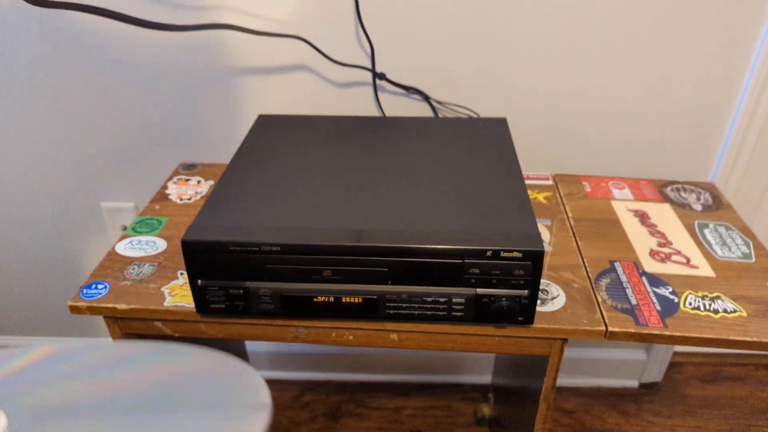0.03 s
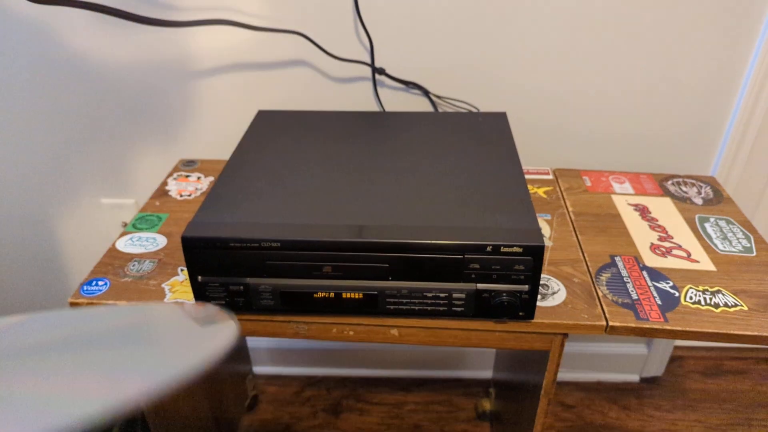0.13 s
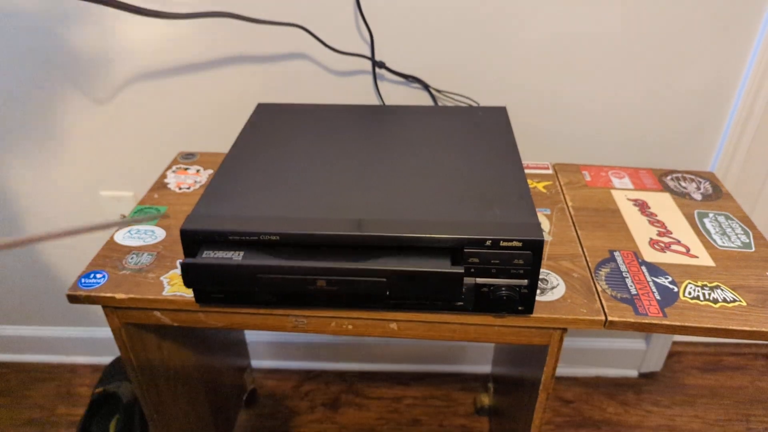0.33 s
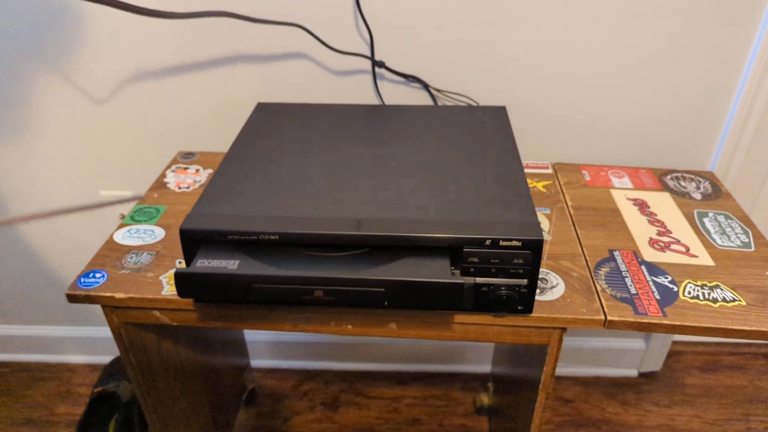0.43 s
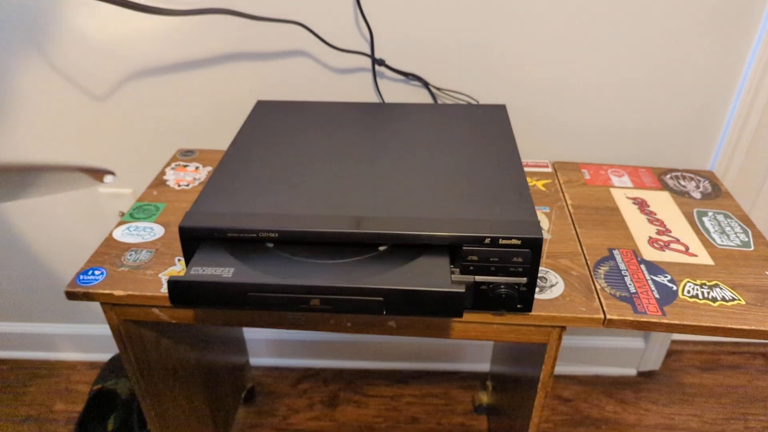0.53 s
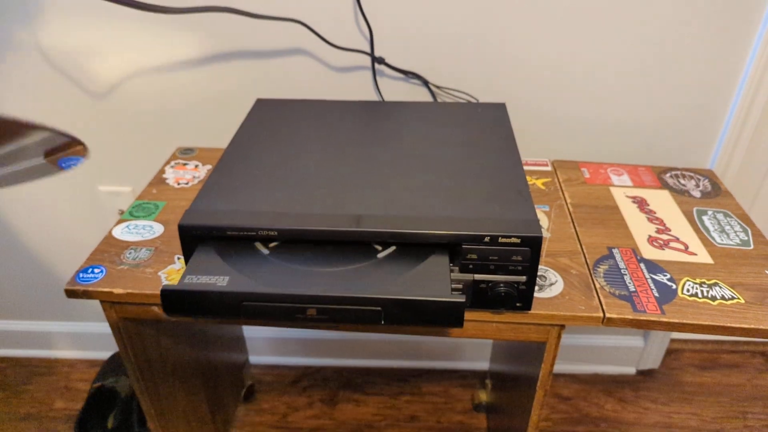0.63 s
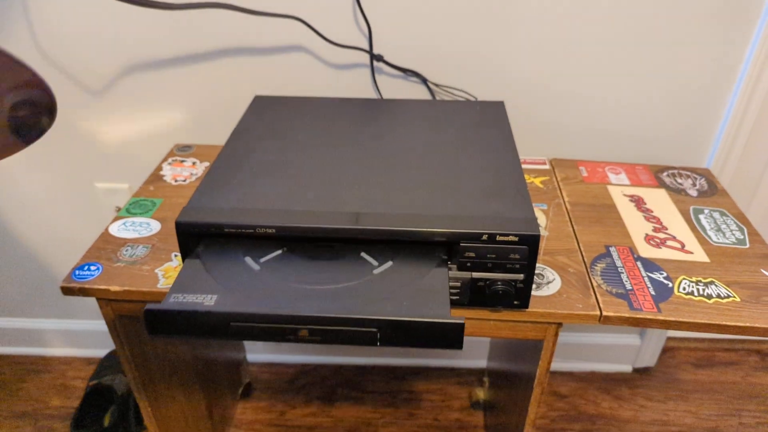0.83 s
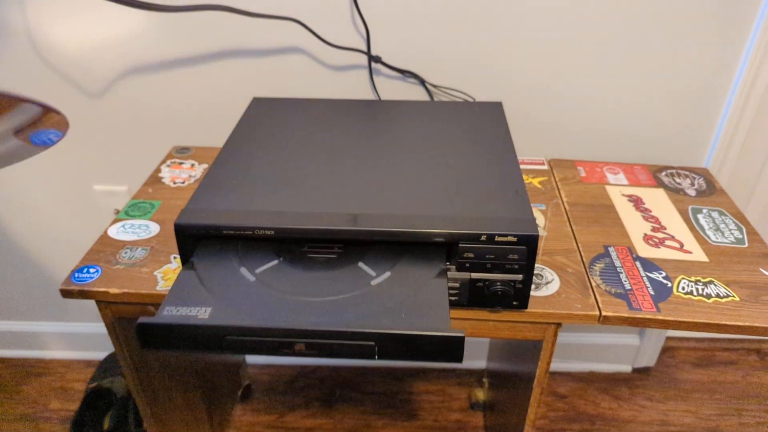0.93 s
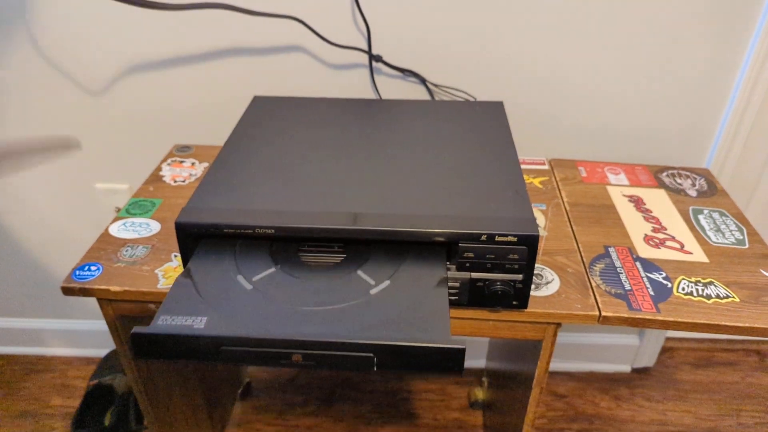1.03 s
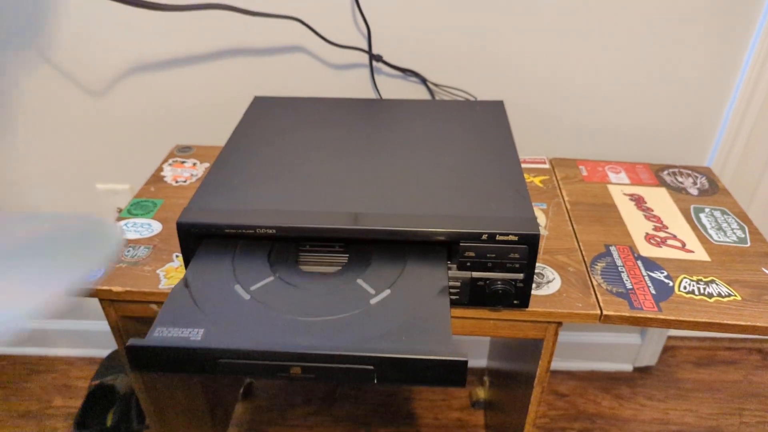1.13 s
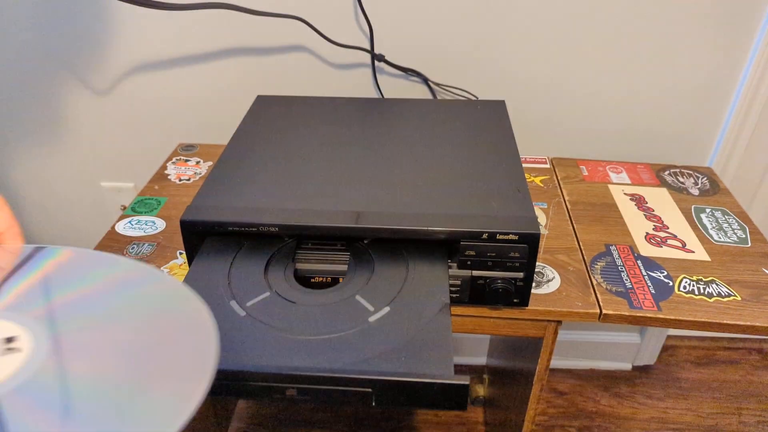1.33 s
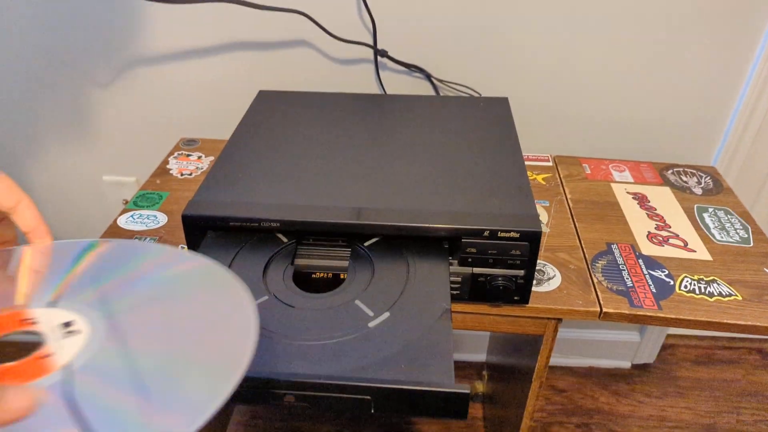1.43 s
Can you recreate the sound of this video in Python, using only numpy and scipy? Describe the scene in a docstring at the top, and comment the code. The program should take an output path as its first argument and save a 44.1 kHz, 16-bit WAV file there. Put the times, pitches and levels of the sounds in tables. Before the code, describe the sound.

In a quiet room, a disc player's tray unlatches with a rapid plastic clatter that booms slightly in a wooden table. Its motor then whirs low and hollow as the tray rolls out, lightly ticking and bumping.

```python
"""A light tick and a faint spin of gears, then a quick run of plastic knocks: a carousel disc player
opens its tray on a wooden table in a small quiet room. The knocks are the disc clamp letting go;
they boom in the table and ring the steel cabinet. Then the geared tray slides out with a low whir
and a hollow drone, scraping its rails and bumping now and then."""
import sys
import numpy as np
from scipy import signal
from scipy.fft import rfft, irfft, next_fast_len
from scipy.io import wavfile
from scipy.ndimage import map_coordinates

SR = 44100
rng = np.random.default_rng(int(sys.argv[2]) if len(sys.argv) > 2 else 0)


def generate_wav(signal):
    """Clip the signal to [-1, 1] and save it as 16-bit WAV at the path in sys.argv[1]."""
    frames = np.transpose(np.atleast_2d(signal))
    scaled = np.clip(frames, -1, 1) * 32767
    pcm = np.round(scaled).astype(np.int16)
    wavfile.write(sys.argv[1], SR, pcm)


N = 66150


def amp(db):
    """Decibels to gain."""
    return 10 ** (np.asarray(db) / 20)


def since(start_s):
    """Seconds since start_s, zero before it."""
    return np.maximum(np.arange(N) / SR - start_s, 0)


def curve(points):
    """Automation: (time_s, value) points as one value per sample."""
    return np.interp(since(0), *np.transpose(points))


def wobble(rate_hz):
    """Smooth random modulation through rate_hz points a second."""
    return map_coordinates(rng.standard_normal(1000), [since(0) * rate_hz], mode="wrap")


def decay(t, attack_s, t60_s):
    """Percussive envelope: a rise, then an exponential fall."""
    return (1 - np.exp(-t / attack_s)) * np.exp(-np.log(1000) * t / t60_s)


def filtered(x, response):
    """x through a gain that depends on frequency."""
    size = next_fast_len(N + SR // 2)
    return irfft(rfft(x, size) * response(np.fft.rfftfreq(size, 1 / SR)), size)[:N]


def coloured(x, eq):
    """x through an EQ of (freq_hz, gain_db) points, scaled to rms 1."""
    freq_hz, gain_db = np.transpose(eq)
    shaped = filtered(x, lambda hz: amp(np.interp(np.log(hz + 1), np.log(freq_hz), gain_db)))
    return shaped / np.sqrt(np.mean(shaped ** 2) + 1e-20)


def noise(eq):
    """Fresh noise through an EQ, at rms 1."""
    return coloured(rng.standard_normal(N), eq)


# Dark bed of the room: freq_hz, gain_db
ROOM_EQ = [(20, -49), (38, 1.5), (55, 3.5), (115, 7), (170, -1.5), (290, 1.5), (450, -4), (1300, 0),
           (2100, -2), (3300, -17), (10000, -33.5), (15500, -35)]

def room_tone(level_db=-59):
    """The steady hush of a small room."""
    return amp(level_db) * noise(ROOM_EQ)


def early_echoes(x, level_db=-15.5, centre_hz=2210, width_octaves=2.13):
    """Table and wall add eight weak reflections to x, mostly in the midrange."""
    delays_s = rng.uniform(0.001019, 0.011, 8)

    def response(hz):
        midrange = np.exp(-(np.log2((hz + 1) / centre_hz) / width_octaves) ** 2)
        echoes = np.exp(-2j * np.pi * np.outer(hz, delays_s)).sum(1)
        return 1 + amp(level_db) * midrange * echoes
    return filtered(x, response)


# Fader ride of the drone: time_s, level_db
DRONE_LEVEL = [(0, -64), (.48, -76), (.56, -59), (.67, -58), (.76, -70.5), (.95, -63.5), (1.12, -71.5),
               (1.25, -66), (1.5, -65)]
# Hollow body of the tray: freq_hz, gain_db
DRONE_EQ = [(100, -31), (170, -3.5), (220, 1), (310, 1), (370, -16.5), (1000, -44)]

def tray_drone():
    """The tray drones low and hollow, swelling and sinking."""
    return amp(curve(DRONE_LEVEL)) * noise(DRONE_EQ)


# Tone of the free-running gears: freq_hz, gain_db
IDLE_EQ = [(150, -30), (230, -5), (420, -4.5), (620, -13), (800, -25), (950, -31), (1280, -1), (1600, -9.5),
           (2100, -2), (2400, -7), (3400, -20.5), (8500, -20), (12200, -21), (15500, -29)]

def idle_gears(start_s=0.025, stop_s=0.27, ramp_s=0.047, level_db=-58.5):
    """The gears spin up and run free until the tray moves."""
    fade_in = np.clip(since(start_s) / ramp_s, 0, 1)
    fade_out = np.clip(since(stop_s) / ramp_s, 0, 1)
    return (fade_in - fade_out) * amp(level_db + 1.4 * wobble(92)) * noise(IDLE_EQ)


# Cues for the cam and gear rack: start_s, level_db
TICK_CUES = [(0.028, -47), (0.129, -54.5), (0.199, -45), (0.206, -37), (.700, -60), (.803, -52),
             (0.81, -49.5), (.848, -50.5), (1.097, -48), (1.267, -49), (1.427, -50)]
# Midrange snap of a tick: freq_hz, gain_db
TICK_EQ = [(300, -37), (950, -19), (1300, 4.5), (1500, 4.5), (1750, 1), (2050, 5), (2500, -9),
           (3200, -22.5), (4400, -18.5), (6000, -23.5), (15000, -27)]

def cam_ticks():
    """Light, dry plastic contacts that leave the cabinet silent."""
    return sum(amp(db) * decay(since(start_s), attack_s=0.00085, t60_s=0.079) * noise(TICK_EQ)
               for start_s, db in TICK_CUES)


# Thuds of the tray: start_s, level_db, pitch_hz
BUMP_CUES = [(0.644, -39, 215), (0.768, -41, 90.6), (0.991, -34, 102), (1.06, -42, 58), (1.279, -44, 57.6)]

def tray_bumps():
    """The moving tray bumps: short low thuds with no click."""
    out = np.zeros(N)
    for start_s, db, hz in BUMP_CUES:
        t = since(start_s)
        thud = np.sin(2 * np.pi * hz * t + 0.38 * wobble(70))
        out += amp(db) * decay(t, attack_s=0.012, t60_s=0.057) * thud
    return out


# Fader ride of the sliding hiss: time_s, level_db
HISS_LEVEL = [(0, -71), (.15, -74.5), (.3, -71.5), (.37, -55.5), (.45, -68), (.56, -64.5), (.75, -67.5),
              (.79, -56.5), (.83, -55), (.85, -67.5), (.98, -66), (1.005, -60.5), (1.03, -69), (1.09, -60),
              (1.14, -70), (1.3, -64), (1.4, -71), (1.49, -60.5)]
# Airy top of sliding plastic: freq_hz, gain_db
HISS_EQ = [(3000, -21), (8000, -12), (10300, 1), (11000, -0.5), (12000, 7.5), (13400, -3.5), (15500, 0)]
# Catches on the rails: start_s, length_s, level_db, pitch_hz
SCRAPE_CUES = [(.800, 0.035, -45, 1384), (0.802, 0.046, -48, 927), (1.097, 0.026, -49, 1048),
               (1.306, 0.028, -56.5, 972)]

def rails():
    """Sliding plastic hisses, and squeaks dully where it catches."""
    out = amp(curve(HISS_LEVEL) + 0.83 * wobble(150)) * noise(HISS_EQ)
    for start_s, length_s, db, hz in SCRAPE_CUES:
        t = since(start_s)
        swell = np.sin(np.pi * np.minimum(t / length_s, 1))
        squeak = np.sin(2 * np.pi * hz * t + 1.2 * wobble(140))
        grit = amp(-14) * noise(WHIR_EQ)
        out += amp(db) * swell * (squeak + grit)
    return out


# Motor speed, sagging as the tray hangs further out: time_s, speed_ratio
MOTOR_SPEED = [(0, 0.95), (.62, 1.023), (.75, 1.005), (.92, 0.99), (1.08, .975), (1.22, 0.93), (1.5, 0.94)]
# Load on the drive, the fader for all its layers: time_s, level_db
DRIVE_LOAD = [(0, -61), (.19, -65.5), (.23, -44), (.45, -53.5), (.58, -52), (.75, -54), (.95, -54),
              (1.1, -54.5), (1.25, -54.5), (1.42, -54), (1.5, -55)]
# Whir of the moving tray: freq_hz, gain_db
WHIR_EQ = [(88, -33), (150, -3), (169, 0), (308, -8.5), (346, -31), (373, -11.5), (500, -8.5), (618, -3.5),
           (751, -11.5), (1000, -2.5), (1170, -4), (1400, -2.5), (1600, -4.5), (1800, -2), (1940, -4.5),
           (2230, -5.5), (3620, -21), (4390, -16), (5330, -29), (7130, -18), (8010, -26), (12000, -21.5),
           (15500, -41)]
# Gear whine at speed_ratio 1: pitch_hz, gain_db
WHINE_PARTIALS = [(1039, -10.5), (1078, -15), (1120, -16), (1392, -15), (1765, -15), (1800, -18.5),
                  (2135, -19.5), (4420, -30)]
# Chassis hum, independent of speed: pitch_hz, gain_db
HUM_PARTIALS = [(119, -16.5), (612, -20.5), (689, -22.5)]

def tray_drive(tooth_hz=120.84, tooth_count=300, flutter=0.00678):
    """Uneven gear teeth tick over rail friction, gear whine and hum, all following the load."""
    speed = curve(MOTOR_SPEED) * (1 + flutter * wobble(22))
    travel = np.cumsum(speed) / SR  # a clock that runs with the motor
    tooth_places = np.abs(np.arange(tooth_count) + 0.11 * rng.standard_normal(tooth_count)) / tooth_hz
    tooth_gains = amp(2.5 * rng.standard_normal(tooth_count))
    blows = np.bincount(np.searchsorted(travel, tooth_places), tooth_gains, N)[:N]
    chatter = signal.fftconvolve(blows, decay(since(0), attack_s=0.0001, t60_s=0.036))[:N]
    teeth = amp(-5) * coloured(chatter * rng.standard_normal(N), WHIR_EQ)
    friction = amp(-4) * noise(WHIR_EQ) * amp(wobble(30.22))
    whine = sum(amp(db + 2.9 * wobble(19.7)) * np.sin(2 * np.pi * hz * travel + 0.5 * wobble(40))
                for hz, db in WHINE_PARTIALS)
    whine *= amp(-25 * since(1.18))  # tails off at 25 dB a second
    hum = sum(amp(db + 2.8 * wobble(9.37)) * np.sin(2 * np.pi * hz * since(0) + wobble(14))
              for hz, db in HUM_PARTIALS)
    return amp(curve(DRIVE_LOAD)) * (teeth + friction + whine + hum)


# Ringing modes of the steel cabinet: pitch_hz, gain_db, t60_s
CABINET_MODES = [(174.6, -19.5, 0.67), (252.6, -27.5, 0.29), (282.9, -19.5, 0.33), (614, -18, 0.19),
                 (789.4, -7, 0.33), (998, -6, 0.36), (1160, -14, 0.17), (1242, -3, 0.14),
                 (1411.7, -8.5, 0.17), (1479, -3, 0.17), (1601.5, -5.5, 0.17), (1757, -10, 0.15),
                 (2001.5, -11, 0.26), (2270, -11, 0.27)]

def cabinet_ring(low_below_hz=900):
    """The steel gathers energy from every clamp knock; the boom feeds its slower-swelling low modes."""
    out = np.zeros(N)
    for hz, mode_db, t60_s in CABINET_MODES:
        is_low = hz < low_below_hz
        attack_s = 0.034 if is_low else 0.0018
        energy = np.zeros(N)
        for start_s, db, _, ring_db, boom_db in KNOCK_CUES:
            send_db = boom_db - 1 if is_low else ring_db - 6
            energy += (amp(db + send_db) * decay(since(start_s), attack_s, t60_s)) ** 2
        phase = 2 * np.pi * (hz * since(0) + rng.random()) + 0.18 * wobble(46.2)
        out += amp(mode_db + wobble(60)) * np.sqrt(energy) * np.sin(phase)
    return out


# Plastic body of a knock: freq_hz, gain_db
PLASTIC_EQ = [(100, -33.5), (400, -18.5), (620, -17), (900, -2.5), (1400, -3), (2100, 1), (2500, -8.5),
              (3100, -15), (5000, -29), (16000, -48)]
# Bright click on top: freq_hz, gain_db
CLICK_EQ = [(1500, -19), (3200, -9), (4600, 3), (6000, -5), (7200, 6.5), (8000, -5), (8800, 2.5),
            (10800, -13), (12300, 2), (13800, -17), (15500, -5.5)]
# Low weight from the table: freq_hz, gain_db
BOOM_EQ = [(40, -29), (110, -10.5), (175, -7), (290, 2), (380, -13), (600, 0), (1000, -42), (4000, -69.5)]
# Hits of the clamp letting go: start_s, level_db, click_trim_db, ring_trim_db, boom_trim_db
KNOCK_CUES = [(.219, -43, 3.5, 8, 10.5), (.250, -36, 5, 6.5, -10), (.255, -37.5, -2, 11, 1.5),
              (.267, -31, 2.5, 2, -5), (.274, -29, 1, -2, -0.5), (.296, -35, 4, -6, 2),
              (.316, -42, 0, -5, 9.5), (.350, -49, -15, 8, 13.5), (.366, -35.5, 0, -8, 3)]

def clamp_knocks():
    """Each knock clicks, rattles the plastic and booms in the table; the room holds it briefly."""
    out = np.zeros(N)
    for start_s, db, click_db, _, boom_db in KNOCK_CUES:
        t = since(start_s)
        room_tail = decay(t, attack_s=0.011, t60_s=0.49)
        plastic = noise(PLASTIC_EQ) * (decay(t, attack_s=0.0014, t60_s=0.092) + amp(-9) * room_tail)
        click = noise(CLICK_EQ) * (decay(t, attack_s=0.0006, t60_s=0.042) + amp(-17) * room_tail)
        boom = noise(BOOM_EQ) * decay(t, attack_s=0.006, t60_s=0.29)
        out += amp(db) * (amp(-2.5) * plastic + amp(click_db - 10.5) * click + amp(boom_db - 13) * boom)
    return out


def scene():
    """Mono mix: the mechanism with its echoes and the ringing cabinet, over the room tone."""
    mechanism = (tray_drone() + clamp_knocks() + cam_ticks() + idle_gears()
                 + tray_drive() + rails() + tray_bumps())
    return (early_echoes(mechanism) + cabinet_ring() + room_tone())[None]


def record(dry):
    """Master EQ: roll off the deep rumble and cut the very top."""
    low_cut_hz, high_cut_hz = 42, 15750
    return filtered(dry[0], lambda hz: (hz < high_cut_hz) * (1 - np.exp(-(hz / low_cut_hz) ** 4)))[None]


dry = scene()
out = record(dry)
generate_wav(out)
```